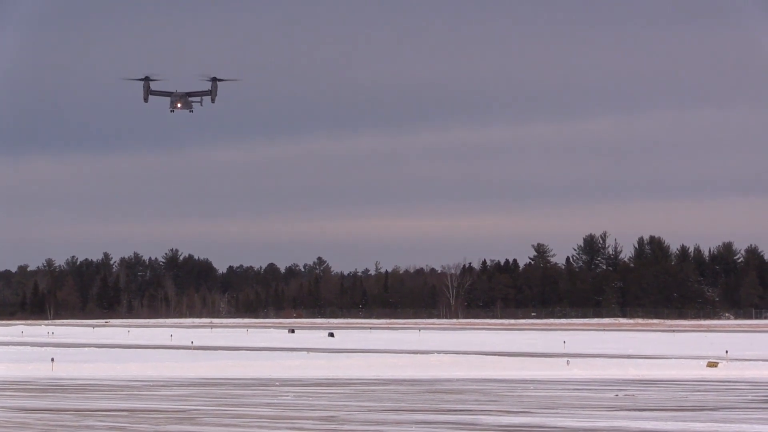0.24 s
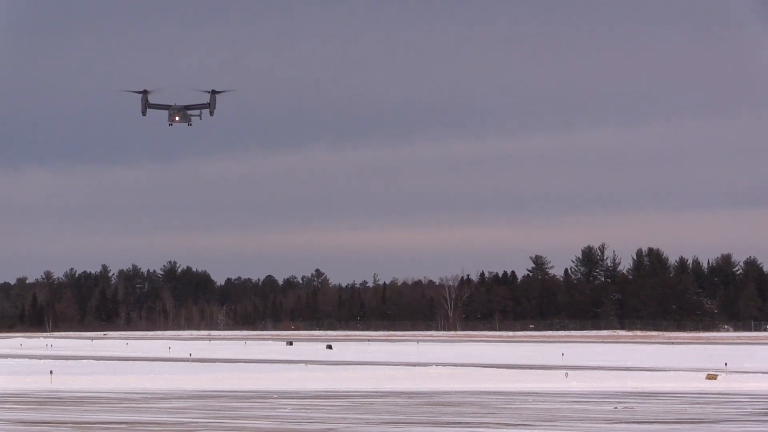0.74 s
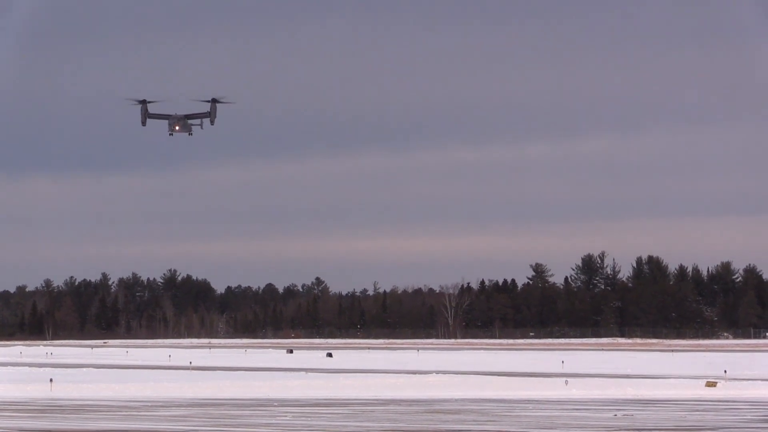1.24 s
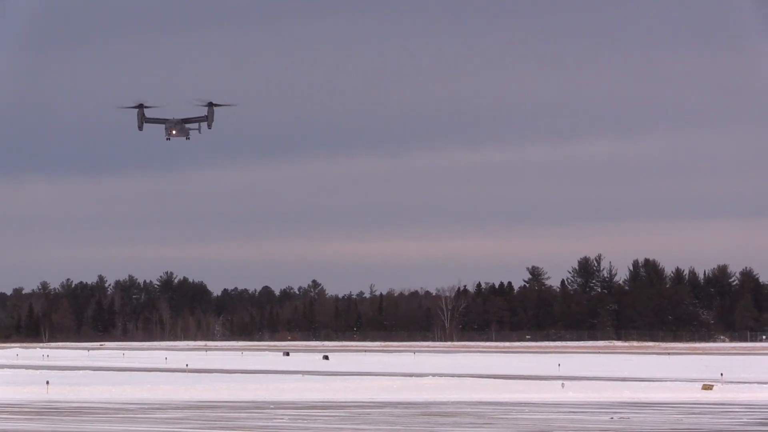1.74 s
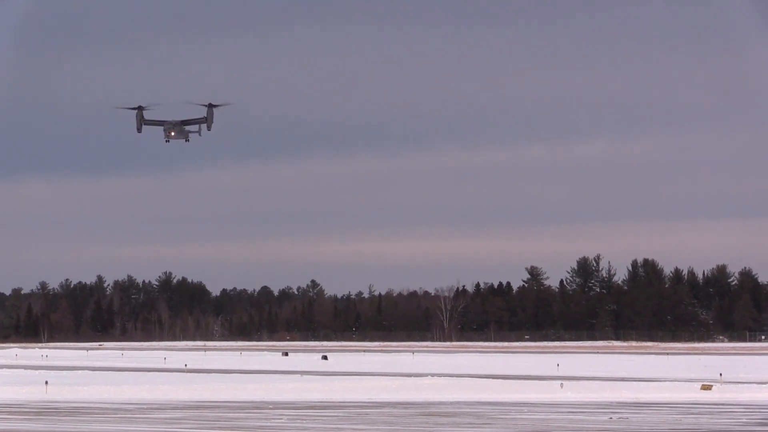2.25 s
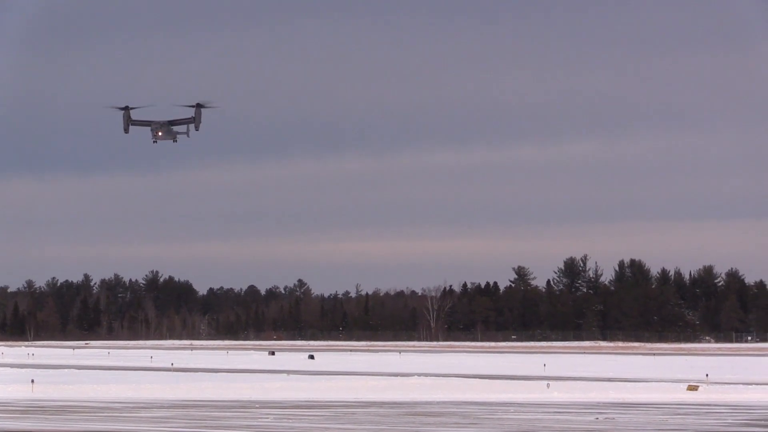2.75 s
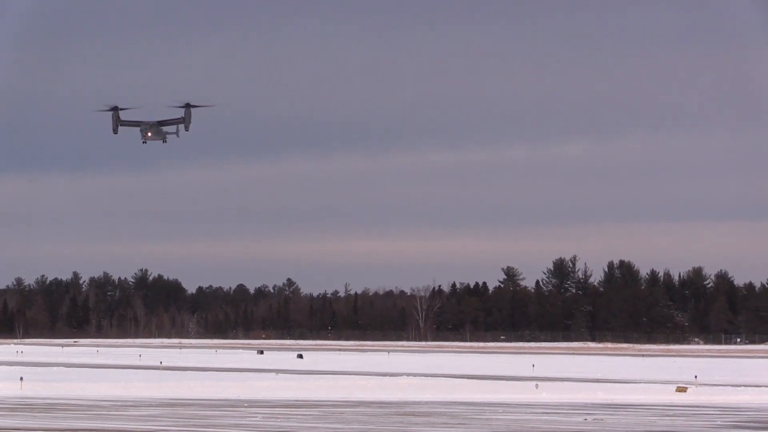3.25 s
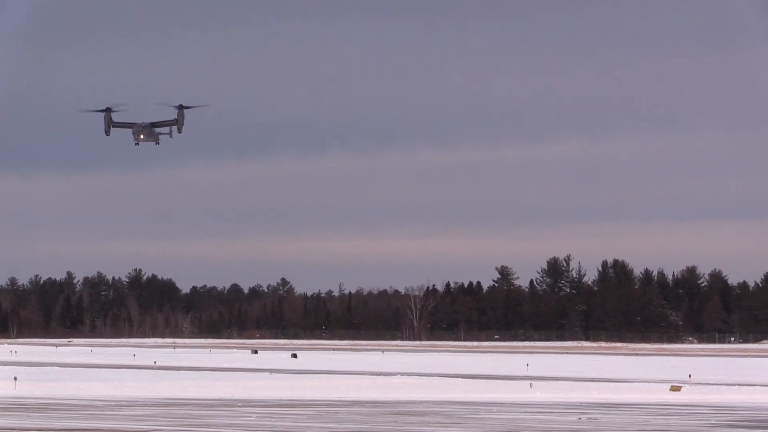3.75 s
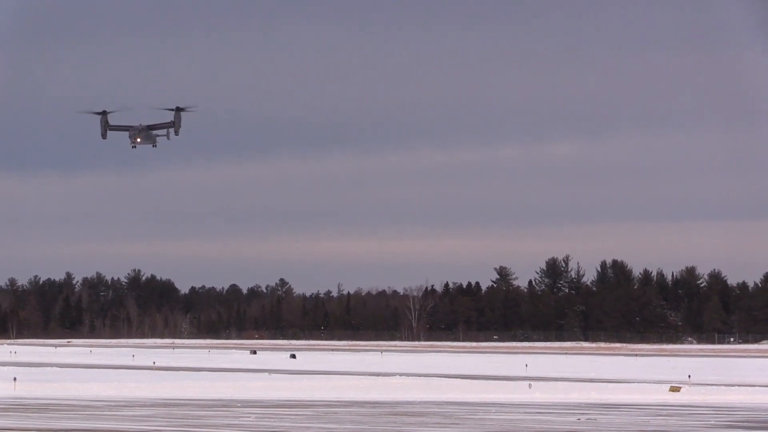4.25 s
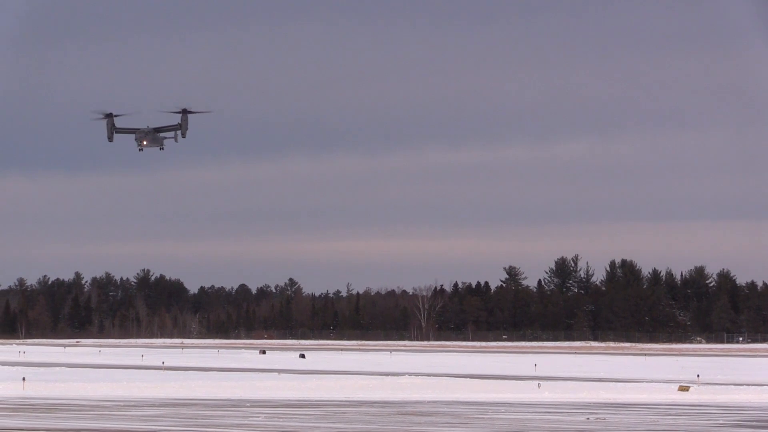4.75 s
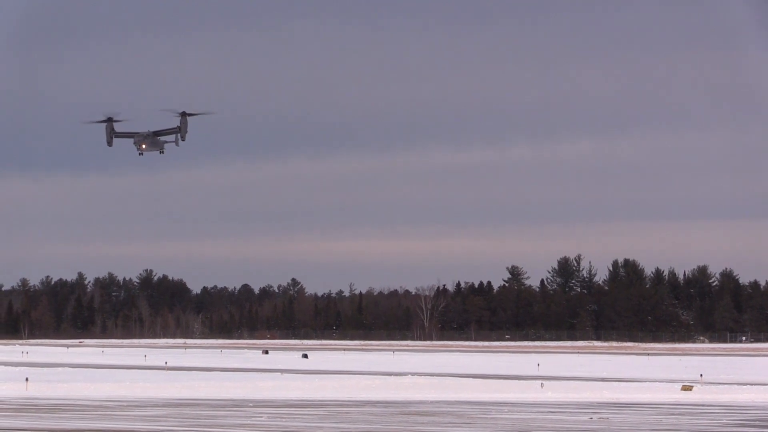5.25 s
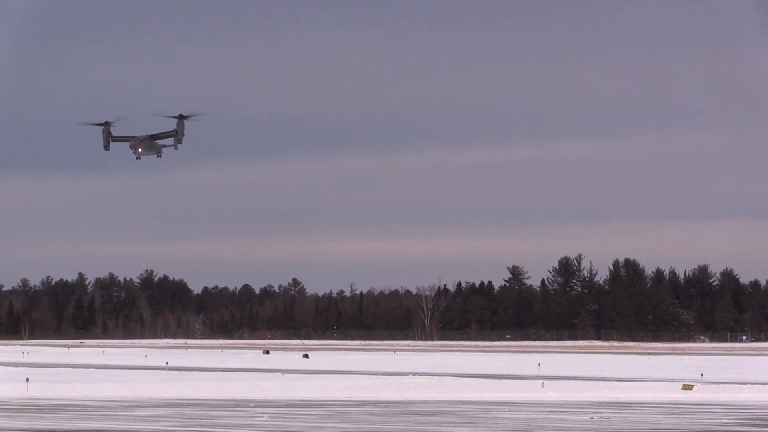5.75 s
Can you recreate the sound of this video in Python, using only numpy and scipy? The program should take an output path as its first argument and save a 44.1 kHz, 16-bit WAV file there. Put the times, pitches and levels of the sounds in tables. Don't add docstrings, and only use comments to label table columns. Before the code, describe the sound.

Loud, continuous low rotor chopping outdoors, picked up by a camera microphone far away. Paired thumps from two rotors and their ground reflections form a dense, throbbing flutter over broadband roar. Light wind buffets the microphone early; clothing crackles and the casing ticks between roughly two and four seconds. Cracks peak past four seconds, then ease as the aircraft draws away and the airy wash rushes on.

```python
import sys
import numpy as np
from scipy import signal
from scipy.io import wavfile
from scipy.ndimage import uniform_filter1d

SR = 44100
rng = np.random.default_rng(int(sys.argv[2]) if len(sys.argv) > 2 else 0)


def put_to_file(sound):
    columns = np.atleast_2d(sound).T
    safe = np.clip(columns, -1, 1)
    whole_steps = np.round(safe * 32767)
    wavfile.write(sys.argv[1], SR, whole_steps.astype(np.int16))


def how_loud(loudness_db):
    steps = np.asarray(loudness_db, float) / 20
    return 10 ** steps


N = 264600


def read(table, s):
    t, *columns = np.transpose(table)
    return [np.interp(s, t, c) for c in columns]


def hump(s, at_s, span_s):
    return np.exp(-((s - at_s) / span_s) ** 4)


def walk(rate_hz):
    k = int(SR / rate_hz)
    held = np.repeat(rng.standard_normal(N // k + 1), k)
    return 0.62 * uniform_filter1d(uniform_filter1d(held, k), k)[:N]


def band(x, lo_hz, hi_hz, order=2):
    return signal.sosfilt(signal.butter(order, [lo_hz, hi_hz], "bandpass", fs=SR, output="sos"), x)


def add_pulses(out, s, db, half_ms, steep=0., size=512, front=0.83, back=0.97, ring_hz=0):
    at = np.round(s * SR).astype(int)[:, None] + np.arange(-size, size)
    age_s = at / SR - s[:, None]
    u = age_s * 1000 / np.reshape(half_ms, (-1, 1))
    u = u + steep * (1 - u ** 2) * np.exp(-u ** 2 / 2) - steep
    front, back = np.reshape(front, (-1, 1)), np.reshape(back, (-1, 1))
    depth = front + (back - front) * (1 + np.tanh(2 * u)) / 2
    shape = np.cos(2 * np.pi * ring_hz * age_s) if ring_hz else 1 - depth * u ** 2
    pulse = how_loud(db)[:, None] * shape * np.exp(-u ** 2 / 2)
    inside = (at >= 0) & (at < N)
    np.add.at(out, at[inside], pulse[inside])


# centre_s, peak_db, half_length_s
GUSTS = [
    (0.417, -47, 0.18),
    (3.503, -54.5, 1.1),
    (5.3, -54.5, 1.3),
]


def wind():
    s = np.arange(N) / SR
    calm_db = -63
    gusts = how_loud(calm_db) + sum(how_loud(db) * np.exp(-((s - at) / span) ** 2) for at, db, span in GUSTS)
    puffs = gusts * how_loud(10 * walk(5.5))
    return puffs * how_loud(19.5) * band(rng.standard_normal((2, N)), 47, 220)


# centre_s, half_length_s, level_db, top_hz
FIDGETS = [
    (1.93, 0.22, -80, 10600),
    (3.148, 0.78, -80, 8630),
]


def crackle():
    s = np.arange(N) / SR
    grains = rng.standard_normal(N) * rng.exponential(size=N) * how_loud(10 * walk(140))
    return sum(how_loud(db) * hump(s, at, span) * band(grains, 4800, top_hz, order=3)
               for at, span, db, top_hz in FIDGETS)


# start_s, peak_db, pitch_hz, decay_ms
RUSTLES = [(1.7419, -60, 6930, 3.6), (1.784, -62, 6080, 6), (1.8387, -66, 6800, 6), (1.9026, -67, 5800, 6),
           (1.927, -65, 6100, 3.7), (1.945, -66, 7000, 3), (1.9594, -70, 5800, 6), (1.9976, -64, 5900, 14),
           (2.044, -62, 6900, 3), (2.057, -62, 5960, 8), (2.0966, -59.5, 5700, 8), (2.7594, -62.5, 5200, 6),
           (2.883, -62, 6800, 10), (2.9098, -57.5, 6000, 3), (3.04, -56, 5270, 6), (3.2, -67, 5970, 8),
           (3.4352, -59, 7000, 9), (3.478, -57, 6060, 5.4), (3.5194, -61, 6000, 2.5),
           (3.5258, -60, 6200, 2.5), (3.5587, -59, 6350, 6.5), (3.7117, -62, 6340, 11)]
# start_s, peak_db, pitch_hz
SQUEAKS = [
    (2.8824, -76, 10750),
    (2.93, -80, 10700),
    (3.1643, -75, 11140),
    (3.21, -76, 10750),
    (3.295, -76, 10900),
    (3.4357, -71, 10800),
    (3.47, -77, 10800),
]
# start_s, peak_db, pitch_hz, decay_ms
CREAKS = [(3.436, -44, 2640, 7), (3.714, -45, 2730, 9), (1.7428, -62, 9600, 1.5), (1.7428, -63, 6750, 1.5),
          (1.786, -64, 5800, 2), (1.927, -67, 6200, 2), (2.045, -65, 6900, 1.5), (2.9105, -51.5, 6050, 1.5),
          (3.4365, -61, 6300, 2), (3.4795, -59, 6000, 1.5), (3.5195, -51, 6000, 1.5),
          (3.5255, -53, 6200, 1.3), (3.528, -65, 9700, 2.5), (3.56, -60, 6300, 2)]


def rustles():
    size = 3000
    out, age = np.zeros(N), np.arange(size) / SR
    for s, db, hz, decay_ms in RUSTLES:
        k = int(s * SR)
        grains = rng.standard_normal(size) * rng.exponential(size=size) * np.exp(-1000 * age / decay_ms)
        bright_db = db - 6.0 - 10 * (s > 2.3)
        out[k:k + size] += how_loud(db - 1.0) * band(grains, 0.88 * hz, 1.2 * hz, order=3)
        out[k:k + size] += how_loud(bright_db) * band(grains, 8600, 10800, order=3)
    for s, db, hz in SQUEAKS:
        k = int(s * SR)
        squeak = rng.standard_normal(size) * np.exp(-age / .022)
        out[k:k + size] += how_loud(db + 13) * band(squeak, hz - 170, hz + 170)
    for s, db, hz, decay_ms in CREAKS:
        k = int(s * SR)
        mode = np.sin(2 * np.pi * hz * age) * np.exp(-1000 * age / decay_ms)
        out[k:k + size] += how_loud(db) * band(mode, .88 * hz, 1.12 * hz)
    return out


# time_s, near_crack_db, far_crack_db, wash_db
TREBLE = [(0.0, -39, -63.5, -50.5), (0.3, -67, -48.5, -48.5), (0.6, -53, -51.5, -46),
          (0.9, -47.5, -58.5, -49.5), (1.25, -41.5, -64, -55), (1.55, -47, -69, -56.5),
          (2.0, -46, -66, -52.5), (2.25, -48.5, -63, -52.5), (2.45, -35.5, -62.5, -53.5),
          (3.0, -34.5, -57.5, -47), (3.6, -32.5, -40.5, -43.5), (4.0, -27, -49.5, -43.5),
          (4.4, -24, -36, -43.5), (4.7, -36.5, -46, -44), (5.0, -42, -56.5, -44), (5.2, -43.5, -39.5, -45),
          (5.6, -49, -41.5, -44.5), (5.8, -69.5, -44, -45)]
# frequency_hz, density_db (per Hz)
WASH = [(40, -17), (100, -11.5), (200, -2.5), (400, -6.5), (820, -15.5), (1000, -20.5), (1500, -22),
        (2080, -30.5), (2620, -38), (3300, -46), (4170, -56), (5200, -61.5), (11500, -79), (13500, -92)]
# frequency_hz, side_db
WASH_SIDE = [(40, -12), (250, -15), (600, -10), (1200, -6.5), (2500, -9.5), (4500, 6), (9000, -8),
             (14000, -10)]
# centre_s, half_length_s, rise_db
SURGES = [
    (0.4, 0.95, 6.5),
    (2.501, 0.39, 3),
    (3.7, 0.25, 0),
    (4.45, 0.16, 5),
    (4.897, 0.36, 3),
]
# centre_s, half_length_s, rise_db, centre_hz
GRIT = [
    (1.9, .25, 3.5, 3300),
    (2.9, .4, 1, 1200),
    (4.35, .35, 2.5, 1603),
    (4.599, .4, 1.5, 780),
    (5.45, 0.22, 3, 1100),
]


def log_read(table, hz):
    table_hz, db = np.transpose(table)
    return np.interp(np.log(hz), np.log(table_hz), db)


def wash():
    s = np.arange(N) / SR
    db = read(TREBLE, s)[2]
    low_db = 1.5 - 0.19 * (db + 48)
    roar_db = -0.7 + sum(rise * hump(s, at, span) for at, span, rise in SURGES)
    roar_db = roar_db + 2 * walk(45)
    swell, clumps = walk(5.0), 3.5 * walk(70)
    grit = [(rise * hump(s, at, span), centre_hz) for at, span, rise, centre_hz in GRIT]
    out, half_band = 0, 2 ** (1 / 6)
    for hz in 41 * 2 ** np.arange(0, 8.6, 1 / 3):
        noise = rng.standard_normal((2, N + 4000))
        mid, side = band(noise, hz / half_band, hz * half_band, order=4)[:, 4000:]
        still = np.clip(hz / 9000, 0, 1)
        colour_db = low_db / (1 + (hz / 400) ** 2)
        colour_db = colour_db + roar_db * np.exp(-(np.log2(hz / 750) / 0.38) ** 2)
        for rise_db, centre_hz in grit:
            colour_db = colour_db + rise_db * np.exp(-(2 * np.log2(hz / centre_hz)) ** 2)
        clump_db = clumps * np.exp(-(np.log2(hz / 1700) / 1.1) ** 2)
        moving_db = db + 46 + colour_db + 1.1 * swell + clump_db + 2.0 * walk(30)
        gain_db = log_read(WASH, hz) + (1 - still) * moving_db
        side = how_loud(log_read(WASH_SIDE, hz)) * side * np.array([[1], [-1]])
        out = out + how_loud(gain_db) * (mid + side)
    return how_loud(-10) * out


# time_s, near_delay_ms, near_echo_lag_ms, far_lag_ms, far_echo_lag_ms
PATHS = [(0.0, 14.85, 5.7, 8.45, 9.1), (0.5, 9.75, 5.8, 8.8, 9.4), (1.0, 6.0, 5.6, 9.4, 9.25),
         (1.5, 3.1, 5.25, 10.5, 8.95), (2.0, 1.35, 5.3, 11.3, 8.9), (2.25, 0.94, 5.37, 11.85, 8.72),
         (2.5, 0.15, 5.8, 13.2, 8.4), (2.75, 0.16, 5.8, 13.55, 8.45), (3.0, 0.8, 5.55, 13.25, 8.6),
         (3.25, 1.05, 5.8, 13.5, 9.0), (3.5, 0.95, 6.3, 15.3, 8.55), (3.75, 1.25, 6.75, 16.2, 8.55),
         (4.0, 1.6, 7.05, 18.0, 7.75), (4.25, 2.58, 7.2, 18.9, 7.75), (4.5, 4.45, 7.05, 18.9, 7.7),
         (5.0, 9.65, 6.95, 18.75, 7.5), (5.5, 14.6, 6.45, 18.7, 7.4), (5.75, 17.85, 5.5, 17.95, 7.3),
         (6.0, 21.5, 5.0, 16.5, 8.6)]


def blade_passages():
    blade_hz = 21.75
    clock = np.arange(-1, 6 * blade_hz + 1) / blade_hz
    delay, echo, far, far_echo = np.array(read(PATHS, clock)) / 1000
    jitter = np.clip(rng.standard_normal((len(clock), 16)).T, -2, 2)
    return clock + delay, echo, far, far_echo, jitter


def torn_air(t, far, c):
    crack_db, far_crack_db, _ = read(TREBLE, t)
    gate = np.zeros(N)
    add_pulses(gate, t + far + .001 * c[15], far_crack_db + 5 + 2.2 * c[11], 2.2, size=1024)
    add_pulses(gate, t, crack_db - 4 + 2.2 * c[10], 1.2, size=1024)
    return gate * band(rng.standard_normal(N), 500, 2055, order=5) * how_loud(12.5)


# time_s, near_slap_db, near_echo_db, far_slap_db, far_echo_db
SLAPS = [(0.0, -10, -15.5, -18, -15), (0.5, -8.5, -9.5, -16, -13.5), (0.75, -12, -9.5, -19.5, -15),
         (1.05, -14.5, -14, -31, -20.5), (1.3, -13, -14, -28, -18.5), (1.75, -13, -11.5, -20, -20.5),
         (2.1, -9, -9, -19, -20.5), (2.5, -9, -10.3, -24.5, -19.5), (2.75, -8.5, -12, -15, -11.5),
         (3.25, -13, -8.5, -16, -10), (3.5, -11, -8, -10.5, -10.5), (4.0, -11, -8.5, -11, -14),
         (4.5, -10, -9.5, -9, -9.5), (5.0, -9, -9, -10, -8), (5.5, -10, -10, -6, -10.5),
         (5.75, -10.5, -7.5, -10.5, -11), (6.0, -7, -6.5, -6, -15.5)]
# time_s, near_second_db, far_second_db, vortex_spacing_ms, suction_notch_db
WAKE = [(0.0, -31, -28, 2.55, -34), (0.5, -25.5, -24, 1.83, -29), (0.9, -24.5, -27, 2.47, -16),
        (1.2, -29, -20.5, 2.43, -17.5), (1.6, -38, -20.5, 1.62, -20.5), (2.0, -32.5, -28.5, 2.7, -16),
        (2.5, -44.5, -39.5, 2.6, -32), (2.75, -28, -24.5, 2.02, -25.5), (3.2, -18.5, -26, 2.17, -30.5),
        (3.5, -20, -15.5, 2.3, -39), (4.25, -20, -24.5, 2.52, -32), (4.5, -15, -19, 2.8, -29),
        (4.8, -15.5, -15, 2.64, -37.5), (5.25, -20.5, -11, 2.46, -41.5), (5.5, -20, -15.5, 3.2, -24.5),
        (6.0, -26, -23, 3.57, -42)]
# time_s, near_ms, near_echo_ms, far_echo_ms
GROUND = [(0.0, 0.86, 1.75, 1.4), (0.5, 0.92, 1.56, 1.21), (1.0, 0.86, 1.39, 1.7), (1.5, 0.75, 0.95, 1.6),
          (2.1, 0.72, 0.97, 1.46), (3.0, 1.04, 1.35, 1.25), (3.5, 0.86, 1.46, 1.33), (4.0, 0.83, 1.9, 2.1),
          (5.0, 0.92, 2.1, 2.23), (5.5, 0.82, 1.55, 1.9), (6.0, 0.9, 1.3, 2)]
# time_s, near_steepening (0-1), far_half_length_ms, far_suction_notch_db
FRONTS = [(0.0, 0.2, 0.75, -24.5), (0.6, 0.29, 0.7, -25), (1.1, 0.35, 0.71, -39), (1.6, 0.51, 1.12, -47),
          (2.2, 0.34, 1.35, -47), (2.8, 0.25, 0.72, -40), (3.4, 0.62, 0.84, -28), (3.9, 0.3, 0.97, -22),
          (4.4, 0.4, 0.86, -18), (4.9, 0.43, 0.83, -30), (5.4, 0.2, 0.83, -20), (6.0, 0.51, 0.8, -24)]
# time_s, lag_ms, level_db
TREELINE = [
    (0.0, 39.5, -23),
    (0.6, 38, -29.5),
    (1.1, 35.5, -30),
    (1.6, 34, -37.5),
    (2.1, 32, -32),
    (2.6, 34, -24),
    (3.1, 35, -35.5),
    (3.6, 46, -45),
]


def far_slaps(t, far, far_echo, c):
    _, _, far_db, far_echo_db = read(SLAPS, t)
    _, second_db, spacing_ms, _ = read(WAKE, t)
    far_echo_ms, far_ms = read(GROUND, t)[2], read(FRONTS, t)[1]
    turn = (1 + np.tanh((t - 2.3) / .9)) / 2
    trees = (24 + (34.54 - 24) * turn) / 1000
    line_ms, line_db = read(TREELINE, t)
    out = np.zeros(N)
    add_pulses(out, t + far + .0001 * c[6], far_db + 1.1 * c[7], far_ms, steep=.15)
    add_pulses(out, t + far + spacing_ms / 1000 + .00015 * c[8], second_db + 1.5 * c[9], .82)
    add_pulses(out, t + far + far_echo + .0001 * c[6], far_echo_db + .6 * c[10], far_echo_ms, steep=.05)
    add_pulses(out, t + trees, far_echo_db - 10.5 + 1.1 * c[11], 2.25, size=1024)
    add_pulses(out, t + line_ms / 1000, line_db + 1.5 * c[11], 1.2)
    return out


# start_s, ringing_db, thin_snap_db
CRACKS = [(0.06, -34, -50), (1.107, -35, -49), (1.153, -38, -42), (1.1992, -32, -32.5), (1.2451, -32, -39),
          (1.2913, -39, -41.5), (1.337, -40, -43), (1.383, -31, -43), (1.4281, -30.5, -50),
          (1.474, -31, -44), (1.5198, -32, -47), (1.8407, -38, -46), (1.978, -39, -44.5),
          (2.0698, -34, -47.5), (2.116, -32, -55), (2.3457, -28, -48), (2.391, -26.5, -43),
          (2.4377, -30, -49), (2.4826, -31, -57), (2.5283, -26.5, -57), (2.574, -26, -59),
          (2.6197, -23.5, -52), (2.7115, -24, -52), (2.8048, -21.5, -48), (2.851, -27, -50.5),
          (2.897, -26.5, -43), (2.942, -23, -56), (3.0349, -25.5, -49.5), (3.0814, -26.5, -42.5),
          (3.1269, -26, -52), (3.1725, -24, -50), (3.219, -28, -54), (3.3102, -21.5, -56),
          (3.3566, -27, -49), (3.403, -27, -53), (3.5097, -30.5, -45), (3.7257, -31, -62),
          (3.8159, -25.5, -53), (3.863, -42, -50.5), (3.908, -21.5, -44), (3.9543, -19.5, -42),
          (4.0007, -24.5, -50), (4.047, -13.5, -35), (4.0929, -15.5, -43), (4.1385, -18.5, -46),
          (4.1848, -20.5, -48), (4.2316, -17, -49.5), (4.2784, -18, -48), (4.3241, -16.5, -43),
          (4.3697, -27, -46.5), (4.4166, -21.5, -50), (4.4353, -25.5, -51), (4.556, -20.5, -41),
          (4.602, -25, -59), (4.6951, -24.5, -36), (4.7406, -31, -45), (4.788, -29, -41.5),
          (4.8348, -30, -40), (5.254, -26, -44), (5.5315, -28, -57.5), (5.55, -24.5, -49),
          (5.5956, -19, -45)]


def tip_cracks(t, echo, far, c):
    notch_db, far_notch_db = read(WAKE, t)[3], read(FRONTS, t)[2]
    crack_db, far_crack_db, _ = read(TREBLE, t)
    crack_ms = np.maximum(0.062 + 0.0347 * (crack_db + 45), .14)
    crack_ms = crack_ms * (1 - 0.33 * hump(t, 1.1, 0.15))
    out = np.zeros(N)
    add_pulses(out, t - .0011, notch_db + .9 * c[13], .3)
    add_pulses(out, t + echo - .0014, notch_db - 4 + .9 * c[12], .38)
    add_pulses(out, t + far - .0012, far_notch_db + 1.3 * c[8], .36)
    add_pulses(out, t - .0011 + 0.0002 * c[12], crack_db + 9 + 1.8 * c[13],
               crack_ms * how_loud(0.27 * c[14]), size=128)
    add_pulses(out, t + echo - .0011, crack_db - 5.5 + 2.6 * c[13], .17, size=128)
    add_pulses(out, t + far - .0008 + .0005 * c[15], far_crack_db + 8 + 1.8 * c[14],
               .19 * how_loud(.6 * c[12]), size=128)
    s, ring_db, snap_db = np.transpose(CRACKS)
    snap_db = snap_db - .7 + 3 * hump(s, 1.27, 0.18)
    snap_ms = 0.32 * (1 - .45 * hump(s, 1.27, .2))
    add_pulses(out, s, ring_db + 1.0, 0.35, size=128, ring_hz=1545)
    add_pulses(out, s, snap_db, snap_ms, size=128, ring_hz=3030)
    return -out


# time_s, ahead_of_near_slap, behind_it, behind_its_ground_echo
TROUGHS = [(0.0, 1.26, 1.17, 0.7), (0.6, 0.68, 0.84, 1.3), (1.0, 1.45, 1.23, 1.3), (1.3, 0.9, .95, 0.4),
           (1.8, 1.14, 1.1, 0.48), (2.25, 0.73, 0.69, 0.69), (2.8, 0.99, 0.79, 1.62),
           (3.5, 1.26, 0.58, 0.71), (4.15, 0.65, 0.38, 1.2), (4.9, 0.65, 0.78, 0.98),
           (5.4, 0.46, 0.96, 0.68), (5.8, 0.39, 1.34, 0.71)]


def near_slaps(t, echo, c):
    near_db, echo_db, far_db, _ = read(SLAPS, t)
    second_db, _, spacing_ms, _ = read(WAKE, t)
    near_ms, echo_ms, _ = read(GROUND, t)
    ahead, behind, echo_behind = read(TROUGHS, t)
    steep = read(FRONTS, t)[0][:, None]
    second = spacing_ms / 1000 - 0.0006 * hump(t, 4.1, 0.36)
    thump = np.minimum(8.7 + 4.8 * abs(t - 2.9), 17.8) / 1000
    load_db = far_db + 8
    thump_db, early_db = -21.5 + 1.9 * load_db, np.minimum(-41 - 6.5 * load_db, -26)
    hull_db = -23.5 - 17.5 * np.clip((t - 2.7) * 4 + .5, 0, 1)
    swell_db = -42 + 18.5 * hump(t, 2.8, 0.66)
    out = np.zeros(N)
    add_pulses(out, t + .00006 * c[0], near_db + .5 * c[1], near_ms, steep=steep, front=ahead, back=behind)
    add_pulses(out, t + second + .0001 * c[2], second_db + 1.5 * c[3], .63)
    add_pulses(out, t - .003 + .00015 * c[2], early_db + 1.5 * c[4], 1.25)
    add_pulses(out, t + echo + .00006 * c[0], echo_db + .5 * c[5], echo_ms, steep=.25,
               front=1 + .2 * hump(t, 4.3, .85), back=echo_behind)
    add_pulses(out, t + thump, thump_db, 3.8, size=1024)
    add_pulses(out, t + .0303, hull_db, 2.2, size=1024)
    add_pulses(out, t - .0045, swell_db, 3.2, size=1024)
    return out


def duck(x):
    release_ms, knee_db, slope = 11, -28.5, 0.53
    keep = np.exp(-1000 / (release_ms * SR))
    power = signal.lfilter([1 - keep], [1, -keep], x ** 2)
    gain = uniform_filter1d((1 + power / how_loud(2 * knee_db)) ** -slope, size=60)
    return gain / uniform_filter1d(gain, size=8100)


def port_lead(x):
    return np.gradient(x) * np.array([[1], [-1]])


def scene():
    t, echo, far_lag, far_echo, jitter = blade_passages()
    near = near_slaps(t, echo, jitter) + tip_cracks(t, echo, far_lag, jitter)
    far = far_slaps(t, far_lag, far_echo, jitter) + torn_air(t, far_lag, jitter)
    placed = near * how_loud([[-.2], [.2]]) + far * how_loud([[-.5], [.5]])
    placed = placed + 0.67 * port_lead(near) - .6 * port_lead(far)
    return placed + duck(near + far) * (wash() + crackle()) + wind() + rustles()


# centre_hz, width_hz, left_db, right_db
PORTS = [(513, 78, -2, -0.8), (634, 55, 1.9, 2.2), (1520, 240, 1.5, 0.9), (1770, 150, -2.5, -3.5),
         (1980, 210, 2, 1.5), (2430, 300, -1.5, -2), (3060, 450, 5, 2), (3600, 320, -4, -5.5),
         (4070, 400, 2.5, 2), (4550, 500, -2, -2.5), (5940, 600, -1.5, 2.5)]


def port(x, column, cut_hz):
    x = signal.sosfiltfilt(signal.butter(2, cut_hz, "highpass", fs=SR, output="sos"), x, padtype="even")
    hz, width_hz, db = np.transpose(PORTS)[[0, 1, column]]
    w, a = 2 * np.pi * hz / SR, how_loud(db / 2)
    q, c = np.sin(w) * width_hz / hz / 2, -2 * np.cos(w)
    sections = np.column_stack([1 + q * a, c, 1 - q * a, 1 + q / a, c, 1 - q / a])
    return signal.sosfilt(sections / (1 + q / a)[:, None], x)


def converter_images(bass, pump):
    s = np.arange(N) / SR
    lag_ms = 8.3
    after = np.roll(pump, int(lag_ms * SR / 1000)) ** -1.2
    out = 0
    for hz, db in [(4000, -53.5), (8000, -60.5), (12000, -64.5)]:
        width = 1 + how_loud(-16) * walk(900) * np.array([[1], [-1]])
        flicker = how_loud(db + 5 * walk(160)) * width
        out = out + flicker * after * bass * np.cos(2 * np.pi * hz * s + 2.7 * walk(550))
    return out


def top_cut(x):
    return signal.sosfilt(signal.butter(12, 15600, fs=SR, output="sos"), x)


def record(dry):
    x = np.array([port(dry[0], 2, cut_hz=59), port(dry[1], 3, cut_hz=52)])
    x = x / (1 + (x / .36) ** 4) ** .25
    pump = duck(x.mean(axis=0))
    smooth = uniform_filter1d(uniform_filter1d(x, size=40), size=40)
    bass = 0.13 * np.tanh(smooth / 0.054) * pump ** 1.3
    x = x + how_loud(-60.5) * bass * band(rng.standard_normal(N), 5000, 9000, order=5)
    hiss = rng.standard_normal(N) * how_loud(4.4 * walk(25)) * pump ** 2.3
    x = x + how_loud(-84) * band(hiss, 5200, 12300, order=4)
    x = x + how_loud(-93 + 5 * walk(2.5)) * band(hiss, 12300, 15800)
    x = x + converter_images(bass, pump)
    s = np.arange(N) / SR
    fade_ms = .07
    x = x * np.sin(np.pi / 2 * np.clip(np.minimum(s, s[::-1]) * 1000 / fade_ms, 0, 1)) ** 2
    return top_cut(x)


dry = scene()
out = record(dry)
put_to_file(out)
```